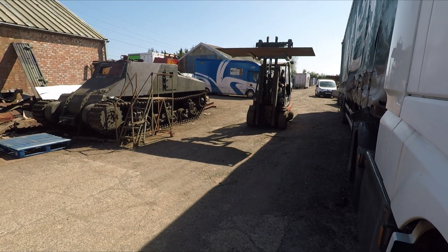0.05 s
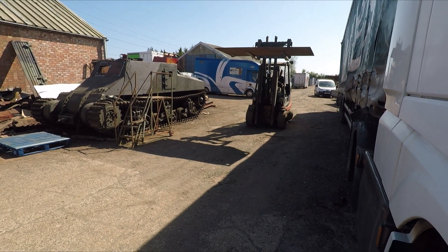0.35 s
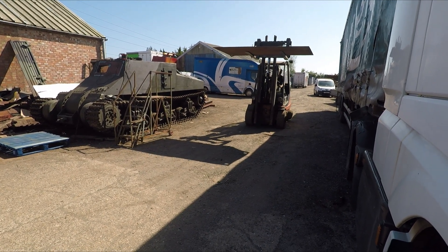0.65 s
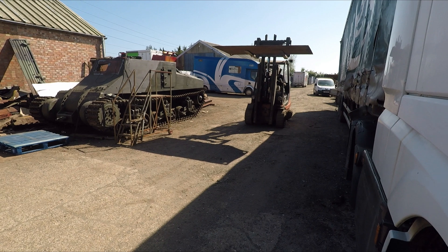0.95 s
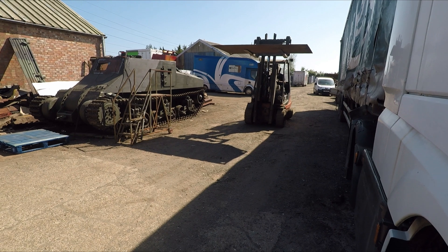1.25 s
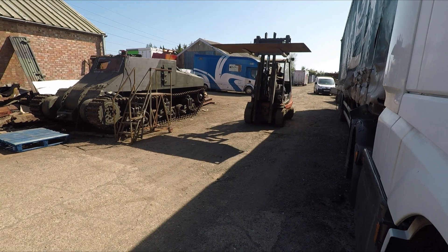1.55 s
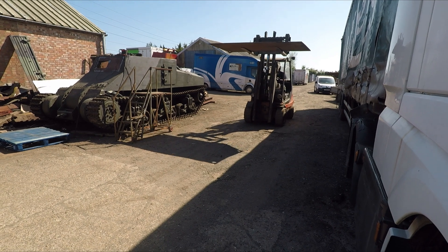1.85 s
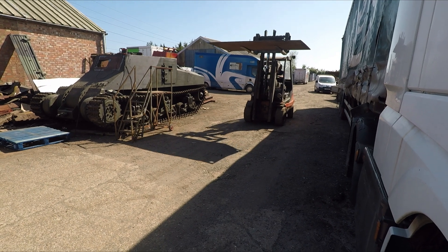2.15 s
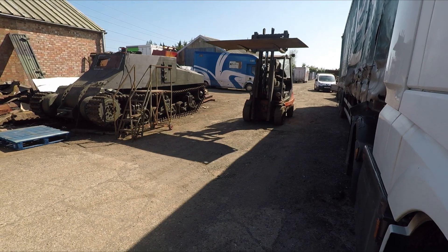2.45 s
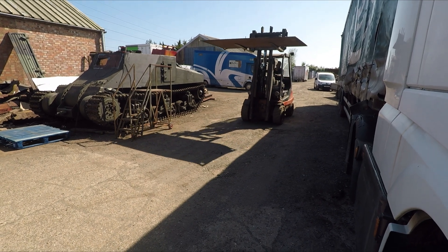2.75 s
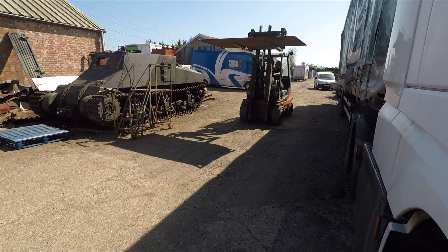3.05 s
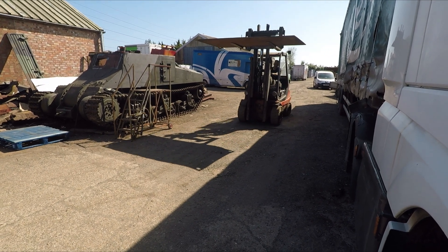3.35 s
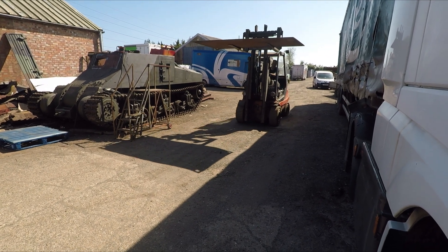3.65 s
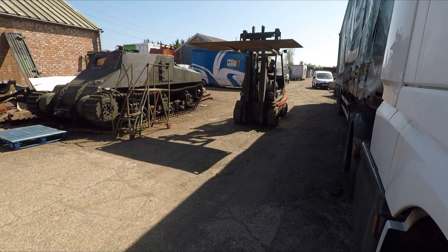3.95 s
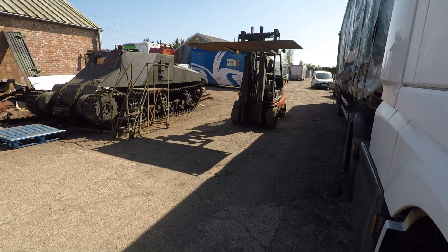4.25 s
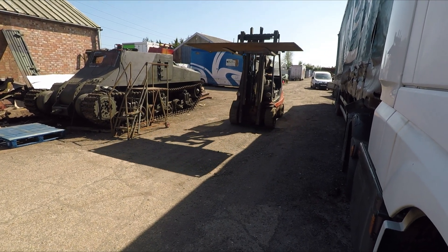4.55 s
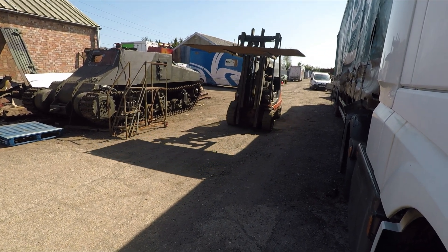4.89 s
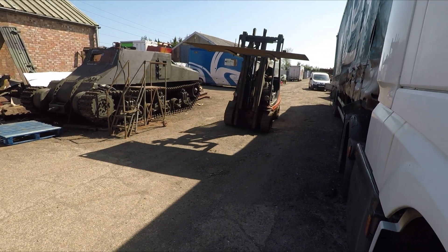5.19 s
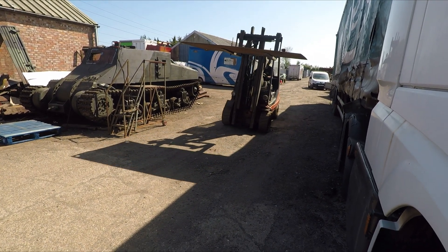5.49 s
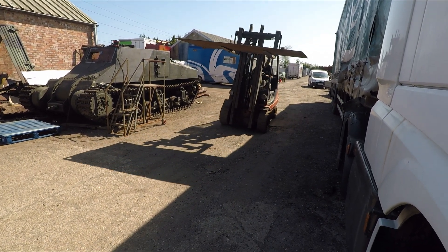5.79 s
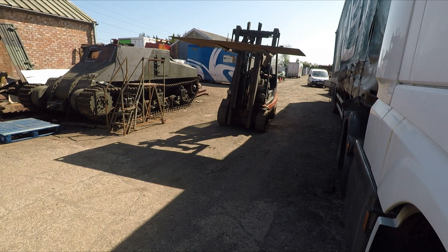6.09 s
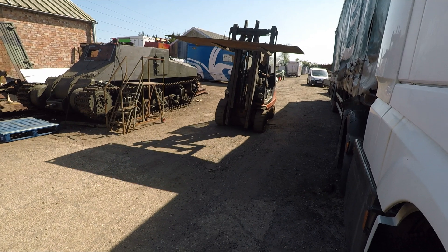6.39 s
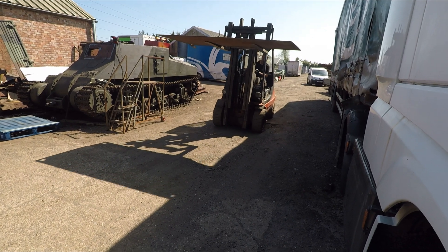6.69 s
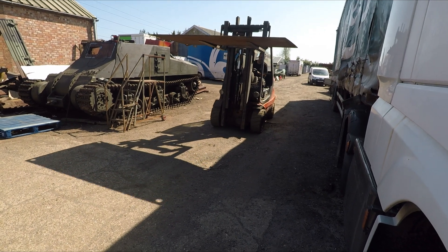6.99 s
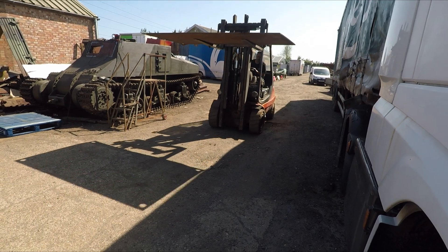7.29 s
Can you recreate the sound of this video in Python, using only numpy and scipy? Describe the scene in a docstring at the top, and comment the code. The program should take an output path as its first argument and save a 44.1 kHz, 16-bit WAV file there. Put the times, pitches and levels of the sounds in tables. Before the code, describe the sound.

A forklift engine drones and chugs, slowly nearing, while its steel plate load clanks a few times in light wind.

```python
"""A yard, where a three-cylinder forklift creeps towards the microphone at low engine speed.
Its firings drive the resonances of the exhaust pipe and engine covers: a drone, a chug and a clatter.
The steel plate on its forks clashes a few times, the chassis jolts and grit snaps under the tyres;
walls and parked vehicles reflect these impacts. Light wind buffets the microphone."""
import sys
import numpy as np
from scipy import signal
from scipy.fft import rfft, irfft, next_fast_len
from scipy.io import wavfile
from scipy.ndimage import uniform_filter1d, map_coordinates

SR = 44100
rng = np.random.default_rng(int(sys.argv[2]) if len(sys.argv) > 2 else 0)


def log_audio(samples):
    """Write samples as a 16-bit WAV file to the path given in sys.argv[1]."""
    # one column per channel
    frames = np.atleast_2d(samples).T
    # limit to full scale, then quantise
    limited = np.clip(frames, -1, 1)
    pcm = np.round(limited * 32767).astype(np.int16)
    wavfile.write(sys.argv[1], SR, pcm)


N = 332073

# The knock of each cylinder, as a relative level in dB.
CYLINDER_DB = [.4, -.8, 1.3]
APPROACH_S, SWING_S = (1.12, 6.3), (2.07, 5.55)  # start and end: the truck nears, and swings round
KNOCK_RISE, KNOCK_DECAY = .14, .35  # time constants, in firing periods


def amp(db):
    """Decibels to amplitude ratio."""
    return 10 ** (np.asarray(db) / 20)


def unit(x):
    """Normalise to rms 1."""
    return x / np.sqrt(np.mean(x ** 2) + 1e-20)


def along(points, hz):
    """Interpolate (Hz, value) points on a logarithmic frequency axis."""
    knots_hz, values = np.transpose(points)
    return np.interp(np.log(hz + 1), np.log(knots_hz + 1), values)


def wobble(rate):
    """A smooth random curve with rate knots a second."""
    knots = rng.standard_normal(int(N * rate / SR) + 4)
    return map_coordinates(knots, [np.arange(N) * rate / SR])


def swells(rows):
    """A sum of Gaussian envelopes. Each row: centre in seconds, level in dB, half-width in seconds."""
    t = np.arange(N) / SR
    return sum(amp(db) * np.exp(-((t - s) / width) ** 2) for s, db, width in rows)


def progress(span):
    """A raised-cosine ramp from 0 to 1 over a (start, end) span in seconds."""
    u = np.clip((np.arange(N) / SR - span[0]) / (span[1] - span[0]), 0, 1)
    return (1 - np.cos(np.pi * u)) / 2


def filtered(x, response):
    """Linear filtering: multiply the spectrum by a complex frequency response."""
    size = x.shape[-1]
    padded = next_fast_len(size + SR // 4)
    return irfft(rfft(x, padded) * response(np.fft.rfftfreq(padded, 1 / SR)), padded)[..., :size]


def noise(spectrum, shape):
    """Coloured noise of rms 1. Each row of a spectrum: frequency in Hz, relative density in dB."""
    return unit(filtered(rng.standard_normal(shape), lambda hz: amp(along(spectrum, hz))))


def tilted(x, tilt):
    """Slope the spectrum by tilt dB per octave between 500 and 9000 Hz; rms 1."""
    return unit(filtered(x, lambda hz: amp(tilt * np.log2(np.clip(hz, 500, 9000) / 2000))))


def resonances(modes, hz):
    """Superposed damped resonators. Each mode: frequency in Hz, bandwidth in Hz, gain in dB."""
    return sum(amp(db) * 1j * hz * width / (centre * centre - hz * hz + 1j * hz * width)
               for centre, width, db in modes)


def add(track, s, sound):
    """Mix a sound into a track, starting at s seconds."""
    part = track[..., max(round(s * SR), 0):][..., :sound.shape[-1]]
    part += sound[..., :part.shape[-1]]


def placed(paths):
    """Phase and level differences: direct, scattered left and scattered right paths reach two ports."""
    # Each row: frequency in Hz, phase lead of the left port in radians.
    lead = [(300, 0), (800, -1.1), (1150, -3), (1800, -4.7), (2250, -4.1), (3000, -6.7), (4500, -6.2),
            (7000, -7.5)]
    # Each row: frequency in Hz, left level minus right in dB.
    pan = [(100, -8), (330, 6), (600, 0), (1000, -7.5), (1400, -6.5), (1800, -1), (2050, -2.5), (2350, 3),
           (3200, -5), (6000, -2), (14000, -3.5)]
    # Each row: frequency in Hz, share of the power that arrives directly.
    direct_share = [(130, 0.69), (280, 0.9), (800, 0.47), (1050, 0.12), (1600, 0.77), (2150, 1),
                    (2500, 0.038), (3800, 0.71), (5200, 0.058), (12000, 0.18)]
    sides = np.array([[.5], [-.5]])
    share = lambda hz: np.clip(along(direct_share, hz), 0, 1)
    direct = filtered(paths[0], lambda hz: np.sqrt(share(hz)) * np.exp(1j * sides * along(lead, hz)))
    scattered = filtered(paths[1:], lambda hz: np.sqrt(1 - share(hz)))
    return filtered(direct + scattered, lambda hz: amp(sides * along(pan, hz)))


def yard_echo(x):
    """Reverberation: reflections from the walls decay exponentially, the treble fastest."""
    # Each row: frequency in Hz, reverberation time in seconds.
    t60 = [(200, 0.6), (2000, 0.47), (10000, 0.055)]
    hz, t, spectra = signal.stft(rng.standard_normal((2, SR // 2)), SR, nperseg=256)
    tail = signal.istft(spectra * amp(-60 * t / along(t60, hz)[:, None]), SR, nperseg=256)[1]
    return signal.fftconvolve(x, tail / np.linalg.norm(tail[0]), axes=1)[:, :N]


def wind():
    """Turbulent pressure: large eddies press on both ports nearly alike, brief puffs on each apart."""
    # Spectra of breeze, strong gusts and puffs. Each row: frequency in Hz, relative density in dB.
    buffet_spectrum = [(5, -25), (15, -9), (42, -2), (62, -6.5), (100, -9.5), (170, -22), (300, -44),
                       (800, -79)]
    churn_spectrum = [(30, -17.5), (95, 25), (170, -7), (270, -12), (450, -35), (1500, -65)]
    puff_spectrum = [(40, -10.5), (110, 3.5), (180, 0), (240, 6.5), (320, -1.5), (420, -7), (600, -29),
                     (1500, -63)]
    # Gusts and puffs. Each row: centre in seconds, level in dB, half-width in seconds.
    gusts = [(.12, -26, 0.21), (.55, -21.5, 0.059), (1.05, -27, 0.34), (1.47, -21, 0.196), (1.8, -23, 0.19),
             (2.3, -24, 0.24), (3.12, -27.5, 0.14), (3.47, -23, .05), (6.95, -25.5, 0.39), (7.4, -36, 0.25)]
    puffs = [(1.309, -34, .01), (1.372, -29.5, .024), (1.495, -33, .022), (1.9, -33, .031),
             (6.96, -33, .015), (7.259, -31, .022)]

    def ports(spectrum, side_db):
        mid, side = noise(spectrum, (2, N))
        return mid + amp(side_db) * np.array([side, -side])

    pressure = amp(-28 + wobble(rate=4)) + swells(gusts)  # gusts on top of a wandering breeze
    buffet = pressure * ports(buffet_spectrum, side_db=-18)
    churn = amp(3.5) * pressure ** 2 * ports(churn_spectrum, side_db=-16)  # strong gusts reach higher
    return buffet + churn + swells(puffs) * ports(puff_spectrum, side_db=6)


def wind_thumps(half_width_cycles=.78, pan_db=3):
    """Pressure pulses: single pushes of air on the microphone, over within a cycle or two."""
    # Each row: time in seconds, peak before panning in dB, centre frequency in Hz.
    pulses = [(1.481, -20.5, 288), (1.501, -15.5, 192), (1.767, -12.5, 129), (2.504, -19, 273),
              (2.527, -29, 268)]
    t = np.arange(N) / SR
    pushes = np.zeros(N)
    for s, db, hz in pulses:
        cycles = (t - s) * hz
        pushes -= amp(db) * np.exp(-(cycles / half_width_cycles) ** 2) * np.cos(2 * np.pi * cycles)
    return pushes * amp([[pan_db / 2], [-pan_db / 2]])


def whistle(pitch_hz=4828, far_db=-82):
    """A faint tone, randomly modulated in pitch and level, grows as the truck nears."""
    level_db = far_db + 6 * progress(APPROACH_S) + 2.2 * wobble(8.2)
    return amp(level_db) * np.sin(2 * np.pi * np.cumsum(pitch_hz + 6 * wobble(30)) / SR)


def thin_tones(waver=.002):
    """Thin tones swell and fade: the engine covers resonate, and a brief high hydraulic whine sounds."""
    # Each row: centre in seconds, level in dB, half-width in seconds, pitch in Hz.
    tones = [(1.2, -59.5, 1.8, 1071), (2.2, -60, 1.2, 1297), (1.6, -60.5, 1.3, 895), (2.9, -55, .25, 3360),
             (.1, -55, .25, 2110)]
    out = np.zeros(N)
    for s, db, width, hz in tones:
        phase = 2 * np.pi * np.cumsum(hz * (1 + waver * wobble(30))) / SR
        out += swells([(s, db, width)]) * np.sin(phase)
    return out


def grit(tick_count=45, snap_t60=.009, tail_t60=.081, tail_gain=.04):
    """Brittle fracture: stones crack and ring under the tyres, a few sharp snaps among faint ticks."""
    # Each row: start in seconds, relative level in dB, share of dry crack against ring.
    loud_snaps = [(1.6252, -38, 0.087), (3.0739, -33.5, .1), (3.3556, -18, 0.03), (3.3837, -36, 0.11),
                  (3.454, -48, 0.73), (4.2712, -32, 0.48), (6.6745, -35, 0.27), (6.795, -34, 0.15),
                  (7.333, -30, 0.037), (7.3435, -25.5, 0.051), (7.3585, -27, 0.66), (7.4545, -36, 0.91)]
    # Spectra of ring and crack. Each row: frequency in Hz, relative density in dB.
    ring_spectrum = [(1000, -21), (4400, -18), (5200, 1), (6800, 22), (7700, 14.5), (8600, -23),
                     (10000, -10.5), (12000, -29.5), (15000, -55)]
    crack_spectrum = [(1000, -14.5), (3500, 3), (7000, -4), (9800, 4), (12000, -27), (15000, -42)]
    out, t = np.zeros((3, N)), np.arange(SR // 25) / SR
    ticks = [(.63 + when * (N / SR - 1.4), -47 + 5 * size, 0)
             for when, size in rng.random((tick_count, 2))]
    stones = list(loud_snaps) + ticks
    rings, cracks = [noise(spectrum, (3, len(stones) * len(t))).reshape(3, len(stones), len(t))
                     for spectrum in (ring_spectrum, crack_spectrum)]
    decay = amp(-60 * t / snap_t60) + tail_gain * amp(-60 * t / tail_t60)
    for k, (s, db, share) in enumerate(stones):
        snap = np.sqrt(1 - share) * rings[:, k] + np.sqrt(share) * cracks[:, k]
        add(out, s, amp(db - 16.5) * unit(snap * decay))
    return placed(out)


def chassis_jolts(rise_s=.00065):
    """Damped vibration: bumps knock the truck's frame, which dies away quickly with a dull sound."""
    # Each row: start in seconds, level in dB, tilt in dB per octave, 60 dB decay time in seconds.
    jolts = [(4.006, -33, 6, 0.036), (4.95, -30.5, 3.5, 0.13), (5.295, -26, 1, 0.18),
             (5.317, -29, -2.5, 0.067), (7.291, -32, 0, 0.033)]
    # Each row: frequency in Hz, relative density in dB.
    frame_spectrum = [(100, -18), (230, 10), (400, 3.5), (680, 3.5), (900, -16.5), (2000, -7.5),
                      (4000, -28), (9000, -58)]
    out, t = np.zeros((3, N)), np.arange(SR // 4) / SR
    for s, db, tilt, t60 in jolts:
        envelope = amp(db - 60 * t / t60) * np.minimum(t / rise_s, 1)
        add(out, s, envelope * tilted(noise(frame_spectrum, (3, len(t))), tilt))
    return placed(out)


def steel_plate(ring_db=-8, mode_shift=.04, rebound_s=.027, taps_per_s=150, tap_s=.002, rattle_gain=.9):
    """Impact excitation: the plate touches the forks, lands and rebounds, each clash stirring its modes."""
    # Each row: first touch in seconds, level in dB, tilt in dB per octave, then the landing's delay,
    # rise and 60 dB decay time in seconds, and the rebound's relative level in dB.
    drops = [(.619, -43.5, 5.5, .0046, .0023, .24, -19), (3.601, -23, -.2, .0145, .012, .29, -8),
             (4.83, -40, 3.5, .0042, .0044, .24, -16), (5.0075, -21.8, -.5, .017, .014, .28, -8),
             (5.283, -36, -1, .004, .0061, .24, -6), (5.403, -20.5, -3, .002, .003, .11, -11)]
    # The bright glancing touch: added dB, added dB per octave, rise and 60 dB decay time in seconds.
    touch = (-10, 5.5, .0005, .07)
    # Modes damped by the forks. Each row: frequency in Hz, bandwidth in Hz, relative gain in dB.
    modes = [(780, 70, 1), (990, 70, 1), (1200, 90, 2), (1470, 90, 4), (1750, 50, 1), (1890, 80, 7),
             (2080, 80, 4), (3450, 80, -7), (3840, 40, -8)]
    # Each row: frequency in Hz, relative density in dB.
    clash_spectrum = [(200, 0.5), (500, -16), (800, -2.5), (1100, 1.5), (1550, 1.5), (2100, 2), (2500, -9),
                      (3600, -8), (4800, -12.5), (7000, -11.5), (8500, -20.5), (10000, -22.5), (11500, -50),
                      (15000, -40)]
    out, t = np.zeros((3, N)), np.arange(SR // 2) / SR
    for s, db, tilt, settle_s, landing_rise, landing_t60, rebound_db in drops:
        landing = (0, 0, landing_rise, landing_t60)
        rebound = (rebound_db, -1.5, .0084, .25)
        contacts = [(0, touch), (settle_s, landing), (settle_s + rebound_s, rebound)]
        seat = np.exp(mode_shift * rng.standard_normal())  # the modes shift with where the plate rests
        response = lambda hz: resonances(modes, hz * seat) / (1 + (hz / 6000) ** 4)
        for delay, (contact_db, added_tilt, rise, t60) in contacts:
            hits = rng.random(len(t)) < taps_per_s / SR  # the plate rattles as it settles
            taps = signal.lfilter([1], [1, -np.exp(-1 / (tap_s * SR))], hits)
            rattle = unit(1 + rattle_gain * uniform_filter1d(taps, size=16))
            ring = unit(filtered(rng.standard_normal((3, len(t))), response))
            clash = noise(clash_spectrum, (3, len(t))) + amp(ring_db) * ring
            envelope = amp(db + contact_db - 60 * t / t60) * np.minimum(t / rise, 1)
            add(out, s + delay, envelope * rattle * tilted(clash, tilt + added_tilt))
    return placed(out)


def cover_buzz(cycle):
    """Forced vibration: loose covers, shaken once a firing, buzz in spells as the engine pulls."""
    # Each row: centre in seconds, level in dB, half-width in seconds.
    spells = [(.15, -47.5, .4), (2.95, -45.5, .35), (7.05, -44, .7)]
    # Each row, before the response is squared: frequency in Hz, bandwidth in Hz, gain in dB.
    modes = [(1350, 90, -3), (1750, 160, -2), (2080, 130, 1)]
    shake = unit(1 + np.cos(2 * np.pi * (cycle * len(CYLINDER_DB) - KNOCK_DECAY)))
    buzz = filtered(rng.standard_normal((3, N)) * shake, lambda hz: resonances(modes, hz) ** 2)
    return placed(swells(spells) * unit(buzz))


def engine_clatter(cycle, fan_gain=.66, scatter_db=1.15):
    """Modulated noise: each firing's knock rings the engine covers, over the steady rush of the fan."""
    # The bay before and after the swing, and its hiss. Each row: frequency in Hz, relative density in dB.
    bay_before = [(100, -7), (220, 12.5), (400, 7.5), (600, 8), (900, 5.5), (1200, -1), (1400, 6),
                  (2100, 4.5), (2500, -4), (3000, -32), (3500, -10), (4100, -9.5), (4700, -54), (6000, -85)]
    bay_after = [(100, -9), (210, 7.5), (320, 5.5), (380, -0.5), (450, 2), (620, 3.5), (760, -1),
                 (1200, -2), (1500, 1), (2100, 4.5), (2500, -7.5), (3000, -30.5), (3600, -9.5), (4600, -40),
                 (6000, -35)]
    hiss_spectrum = [(3000, 4.5), (4600, -1), (5500, -2.5), (6600, 1), (7500, -3), (8200, -10),
                     (9500, -7.5), (11000, -17), (14500, -29)]
    # Cover modes before and after the swing. Each row: frequency in Hz, bandwidth in Hz, gain in dB.
    covers_before = [(595, 29.8, 4.5), (872, 18, 9), (1093, 23, 7), (1299, 21, 8.5), (1633, 10, 11),
                     (2068, 22, 9), (3269, 28, 0)]
    covers_after = [(614, 31, 6), (847, 12, 8), (1023, 6.5, 9.5), (1305, 14, -15.5), (1632, 29, 6.5),
                    (1970, 37, -6.5), (3210, 42, -8.5)]
    # The engine works harder. Each row: centre in seconds, added part in dB, half-width in seconds.
    efforts = [(2.6, -19.5, 1), (7.3, -32.5, 0.31)]
    near, swing = progress(APPROACH_S), progress(SWING_S)
    firing, age = np.divmod(cycle * len(CYLINDER_DB), 1)
    firing = firing.astype(int)
    uneven_db = scatter_db * rng.standard_normal(firing.max() + 3)[firing]
    strength = amp(np.take(CYLINDER_DB, firing % len(CYLINDER_DB)) + uneven_db)
    knock = unit(strength * (1 - np.exp(-age / KNOCK_RISE)) ** 4 * np.exp(-age / KNOCK_DECAY))
    flutter = amp(.23 * wobble(260))  # valves and injectors roughen each knock slightly
    burst = unit(np.hypot(fan_gain, knock * flutter))

    def bay(spectrum, covers, ring_db):
        white = rng.standard_normal((3, N))
        # The fan's low rush does not pulse, so the modulation is cancelled in the bass.
        bass_fill = filtered(white * (1 - burst), lambda hz: 1 / (1 + (hz / 750) ** 4))
        rush = unit(filtered(white * burst + bass_fill, lambda hz: amp(along(spectrum, hz))))
        ring = unit(filtered(rng.standard_normal((3, N)) * burst, lambda hz: resonances(covers, hz)))
        return rush + amp(ring_db) * ring

    body = np.sqrt(1 - swing) * bay(bay_before, covers_before, ring_db=-5.5)
    body += np.sqrt(swing) * bay(bay_after, covers_after, ring_db=-8.5)
    body = filtered(body, lambda hz: 1 / (1 + (hz / 7500) ** 8))  # the bonnet holds back the treble
    hiss = unit(noise(hiss_spectrum, (3, N)) * np.hypot(1.1, burst))
    body_db, hiss_db = -41 + 3.5 * near, -48 + 2.5 * near
    effort = 1 + swells(efforts)  # the hiss grows faster with effort than the knocking
    return placed(amp(body_db) * effort * body + amp(hiss_db) * effort ** 2.6 * hiss)


def exhaust_throb(cycle, harmonic=10):
    """Beating: while the truck turns, one exhaust harmonic swells against its strong neighbour."""
    # Each row: centre in seconds, level in dB, half-width in seconds.
    throbs = [(3.9, -35.5, 0.44)]
    return swells(throbs) * np.cos(2 * np.pi * harmonic * cycle)


def exhaust_chug(cycle, level_db=-34, lag_firings=.17, scatter_db=2, spread_rad=.56):
    """Pipe resonance: each firing sends an uneven puff down the exhaust and rings its air column."""
    # Each row: frequency in Hz, bandwidth in Hz, relative gain in dB when far and when near.
    pipe_modes = [(125.6, 7.5, 1, 3.5), (132.9, 9, 7.5, -0.5), (157.65, 8, -4.5, 1),
                  (222, 12, -14.5, -13.5), (264.5, 5.9, -19.5, -14), (305, 17.6, -26, -12.5)]
    # The puff of each cylinder, as a relative level in dB; one is much the hardest.
    puff_db = [-10, 0, -6]
    firing = np.floor(cycle * len(CYLINDER_DB) - lag_firings).astype(int)
    starts = np.flatnonzero(np.diff(firing)) + 1
    uneven_db = scatter_db * rng.standard_normal(len(starts))
    puffs = np.zeros(N)
    puffs[starts] = amp(np.take(puff_db, firing[starts] % len(puff_db)) + uneven_db)
    puffs = signal.sosfilt(signal.butter(3, (95, 340), "band", fs=SR, output="sos"), puffs)

    def pipe(modes):
        # The higher resonances reach the two ports out of step.
        phase = lambda hz: np.array([[spread_rad], [-spread_rad]]) * np.minimum(hz / 250, 1) ** 3
        return unit(filtered(puffs, lambda hz: resonances(modes, hz) * np.exp(1j * phase(hz))))

    far = pipe([(hz, width, db) for hz, width, db, _ in pipe_modes])
    close = pipe([(hz, width, db) for hz, width, _, db in pipe_modes])
    near = progress(APPROACH_S)
    return amp(level_db) * ((1 - near) * far + near * close)


def exhaust_drone(cycle):
    """Periodic flow sounds harmonics of the engine cycle; the upper ones grow as the truck nears."""
    # Each row: harmonic number, level in dB when far and when near.
    harmonics = [(3, -22.5, -23), (6, -44.5, -37.5), (9, -28.5, -19), (10, -29.5, -28.5), (12, -33.5, -25)]
    near = progress(APPROACH_S)
    drone = sum(((1 - near) * amp(far_db) + near * amp(near_db)) * np.cos(2 * np.pi * k * cycle)
                for k, far_db, near_db in harmonics)
    return np.sqrt(2) * drone * amp([[-.3], [.3]])


def scene(cycle_start_s=.0492):
    """Superposition of truck, load and wind; one engine phase times the exhaust, clatter and buzz."""
    # Each row: time in seconds, firings a second.
    engine_speed = [(0.0, 25.85), (0.5, 25.34), (1.0, 25.3), (1.5, 24.41), (2.0, 24.79), (2.5, 25.31),
                    (3.0, 25.52), (3.5, 26.07), (4.4, 25.53), (5.1, 25.93), (5.6, 26.12), (6.6, 25.79),
                    (7.53, 26.54)]
    firing_hz = np.interp(np.arange(N) / SR, *np.transpose(engine_speed))
    firings = np.cumsum(firing_hz) / SR
    cycle = (firings - firings[round(cycle_start_s * SR)]) / len(CYLINDER_DB)
    clanks = steel_plate() + chassis_jolts()
    snaps = grit()
    echo = yard_echo(amp(-8) * clanks + amp(-11) * snaps)
    exhaust = exhaust_drone(cycle) + exhaust_chug(cycle) + exhaust_throb(cycle)
    machinery = engine_clatter(cycle) + cover_buzz(cycle) + whistle() + thin_tones()
    return exhaust + machinery + clanks + snaps + echo + wind() + wind_thumps()


def record(dry):
    """Band limiting: the highest treble is cut off, and both ends fade briefly."""
    top_hz, fade_s = 15000, .004
    edge_s = np.minimum(np.arange(N), np.arange(N)[::-1]) / SR
    return filtered(dry * np.minimum(edge_s / fade_s, 1), lambda hz: hz < top_hz)


dry = scene()
out = record(dry)
log_audio(out)
```